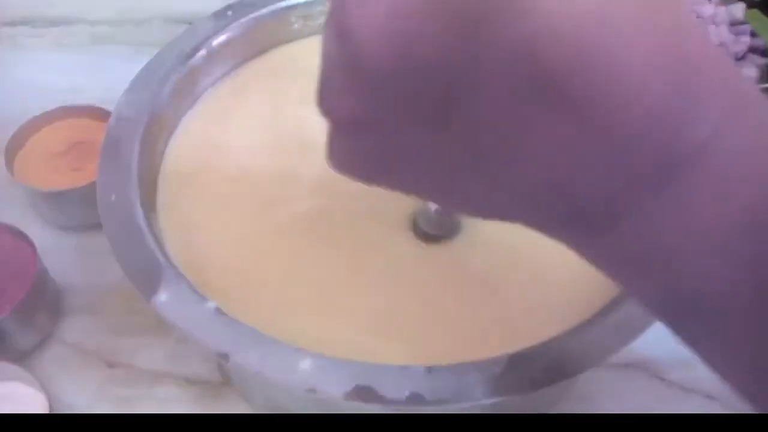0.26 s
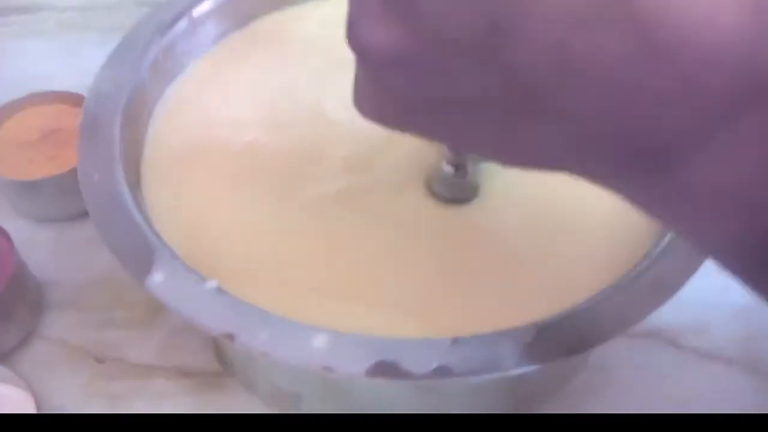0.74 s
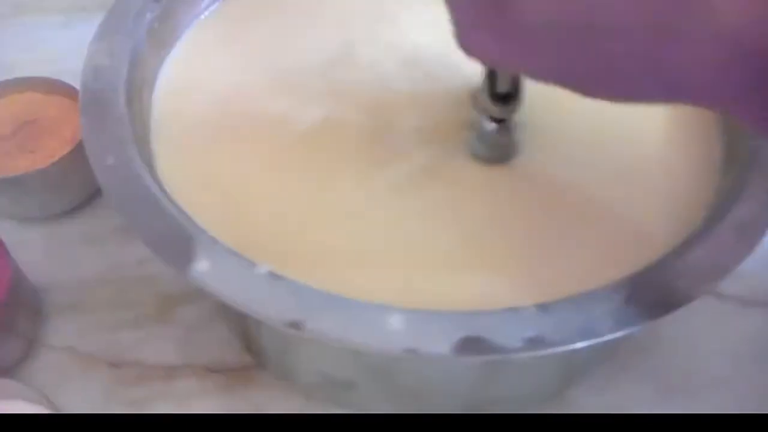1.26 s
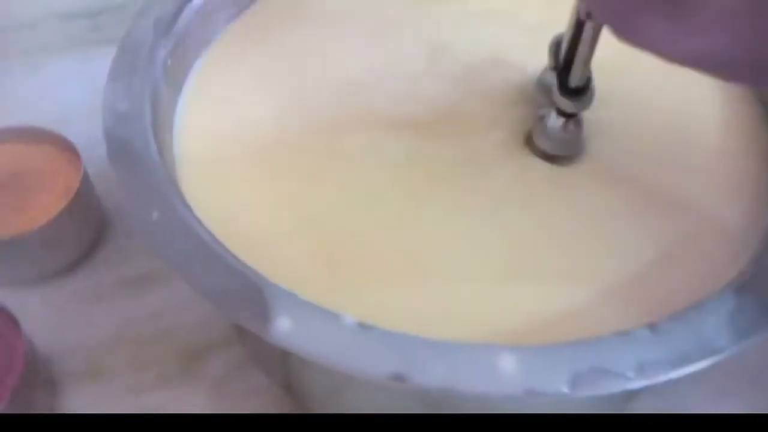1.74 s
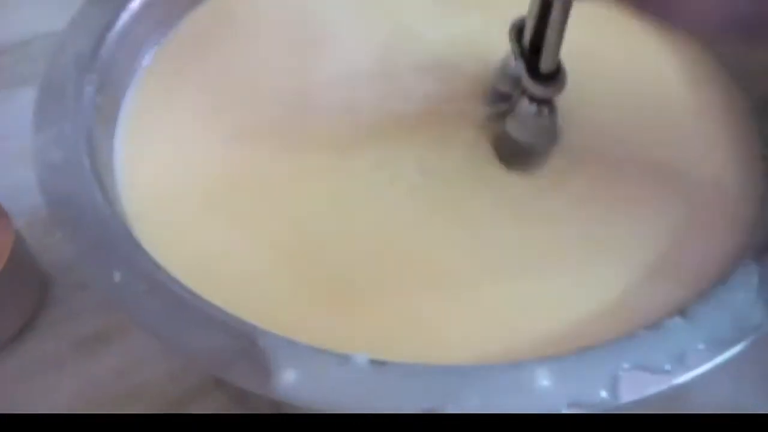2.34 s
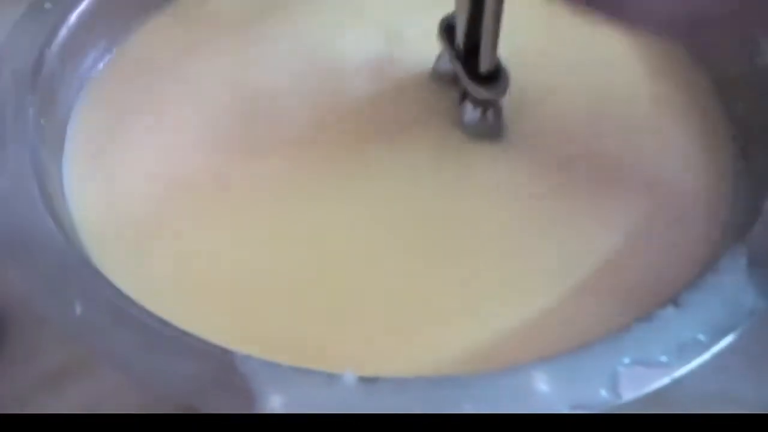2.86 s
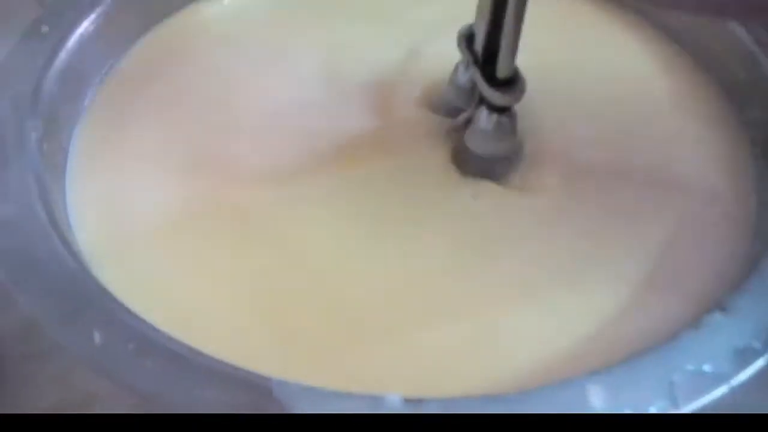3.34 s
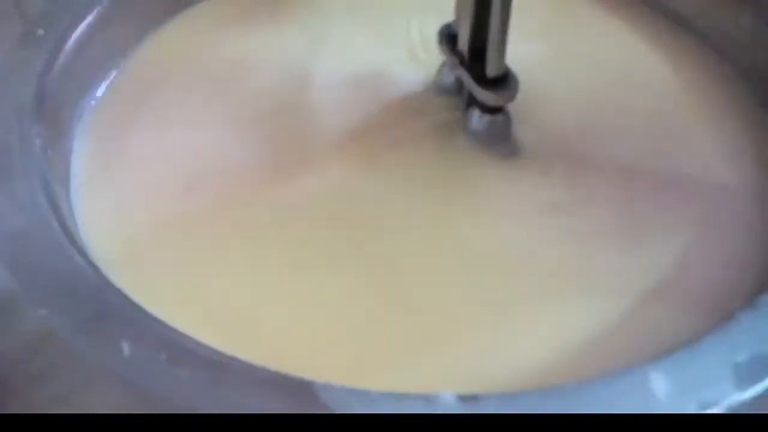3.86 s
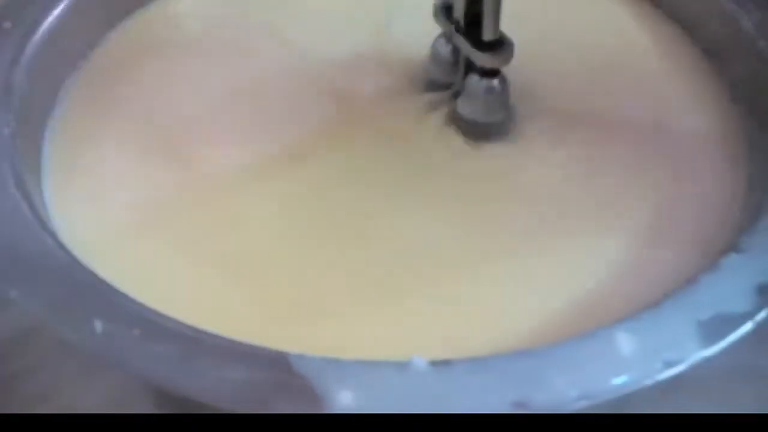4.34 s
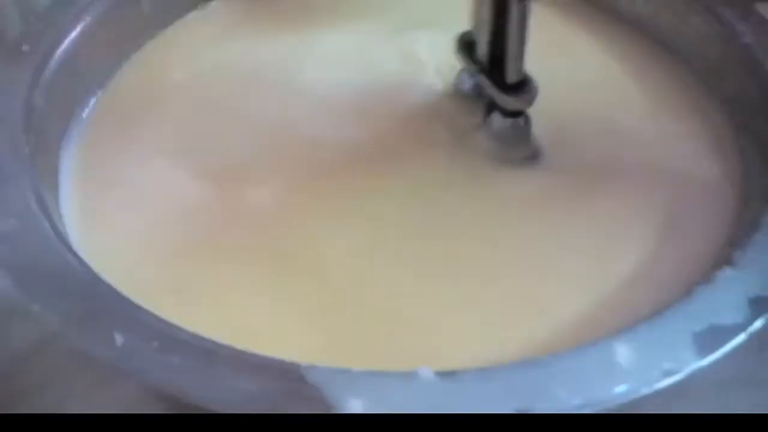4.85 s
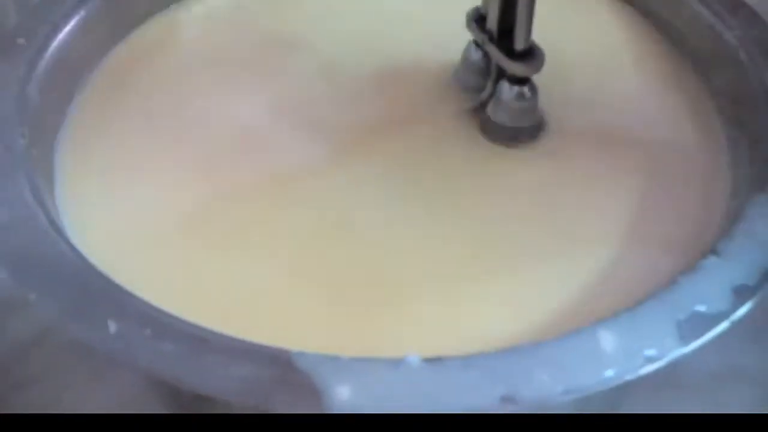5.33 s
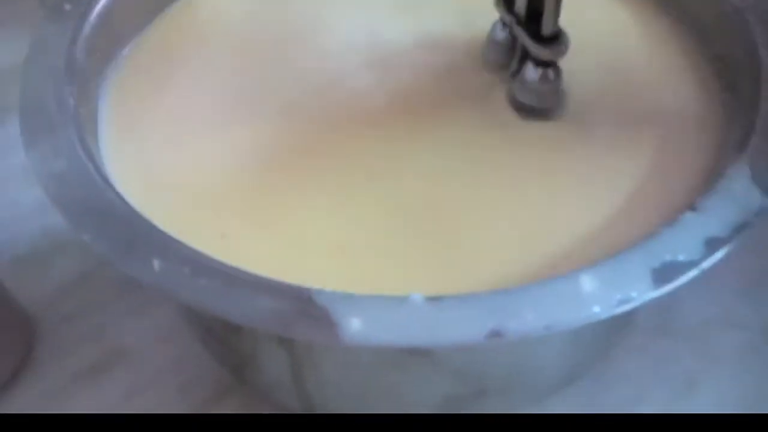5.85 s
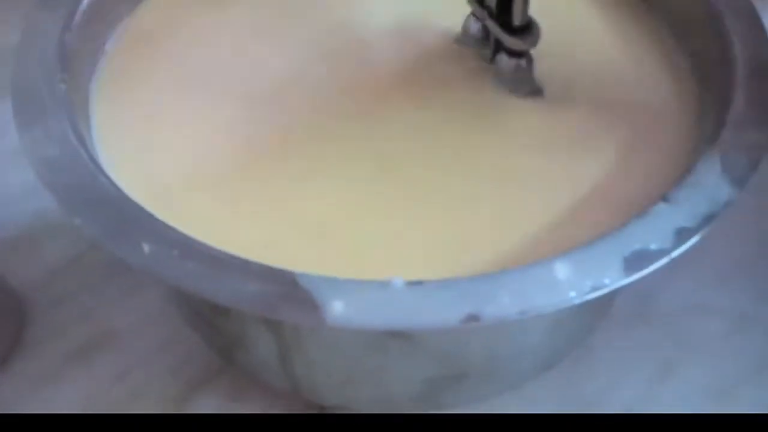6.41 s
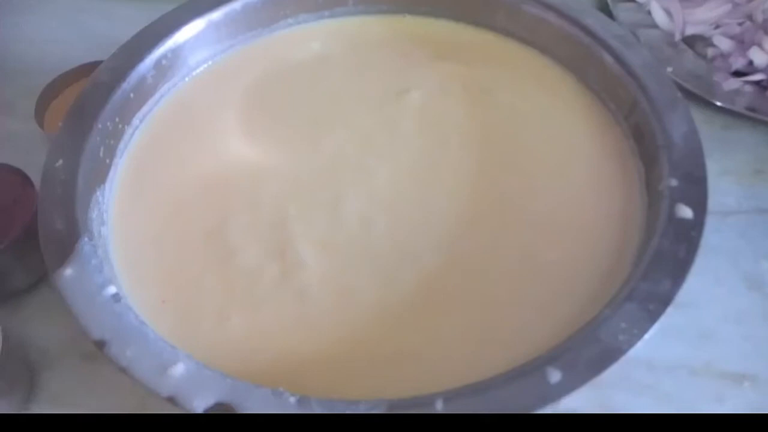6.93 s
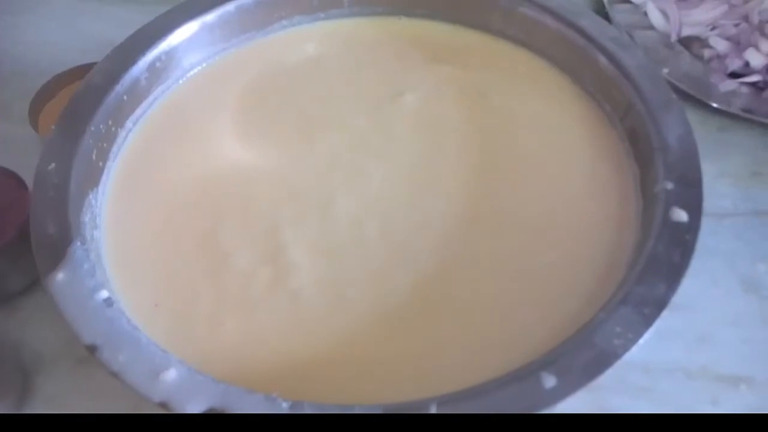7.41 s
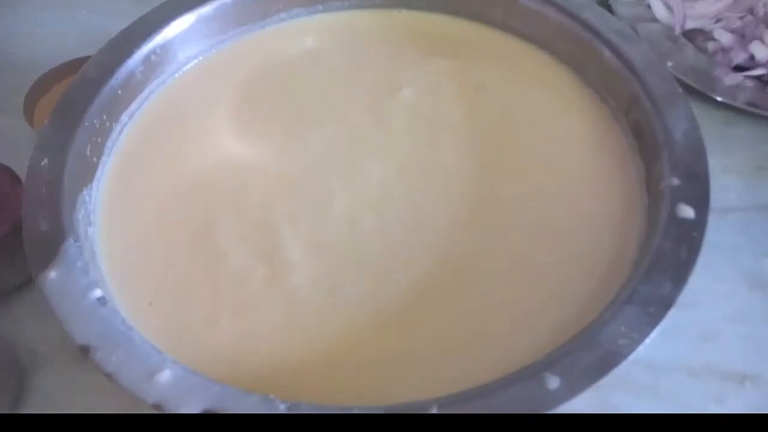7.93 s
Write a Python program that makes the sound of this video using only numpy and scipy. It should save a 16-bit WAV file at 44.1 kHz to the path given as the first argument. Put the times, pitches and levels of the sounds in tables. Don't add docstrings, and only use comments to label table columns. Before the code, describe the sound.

Close to a small microphone, a hand-cranked rotary beater clatters in a steel bowl of thin batter, about thirteen hard, uneven metallic knocks a second over gritty gear chatter. Brief scrapes sing early on. A distant pigeon coos almost inaudibly beneath. At about 6.5 seconds the whisking cuts off, leaving soft kitchen air and fan hum.

```python
import sys
import numpy as np
from scipy import signal
from scipy.fft import rfft, irfft, next_fast_len
from scipy.io import wavfile
from scipy.ndimage import uniform_filter1d

SR = 44100
rng = np.random.default_rng(int(sys.argv[2]) if len(sys.argv) > 2 else 0)


def log_audio(samples):
    frames = np.atleast_2d(samples).T
    limited = np.clip(frames, -1, 1)
    pcm = np.round(limited * 32767).astype(np.int16)
    wavfile.write(sys.argv[1], SR, pcm)


def nominal_scale(level):
    x = np.asarray(level, float) / 20
    return 10 ** x


N = 360605
TIME = np.arange(N) / SR

# (frequency [Hz], width [Hz], level [dB])
BOWL_MODES = [(533, 37, -14.5), (787, 120, -1), (1064, 160, 2), (1240, 74, -4)]
# (frequency [Hz], width [Hz], level [dB])
FRAME_MODES = [(1750, 47, 3), (1980, 1170, -0.5), (2330, 120, 1), (2490, 64, -6), (2670, 135, -5),
               (2840, 83, -0.5), (3100, 220, -5)]
# (frequency [Hz], width [Hz], level [dB])
BLADE_MODES = [(3654, 280, 2.5), (4170, 147, 0), (4585, 540, 0), (5105, 123, -3), (5200, 710, -2),
               (6416, 620, 10)]
# (start [s], length [s], top pitch [Hz], level [dB])
COOS = [
    (3.74, .34, 512, -58),
    (4.66, .44, 521, -55),
    (5.68, .46, 515, -55),
]
# (frequency [Hz], level [dB])
AIR_SPECTRUM = [(30, -7), (170, 7.5), (350, 6), (620, 1.5), (1400, 5.5), (4700, -0.5), (6000, -9),
                (16000, -10.5)]
# (frequency [Hz], width [Hz], level [dB])
FAN_TONES = [(96.8, 9.4, -60), (294, 53, -62), (386, 40, -63.5)]
# (frequency [Hz], width [Hz], level [dB])
SWIRL = (232, 6, -59)
# (frequency [Hz], level [dB])
PORT_SLOPE = [(30, -24.5), (1500, -18), (2200, -11.5), (5300, -11.5), (6500, -18), (7300, -26.5),
              (10000, -27.5), (16000, -33)]
# (frequency [Hz], width [Hz], level [dB])
PORT_PEAKS = [(2700, 356, 3.7), (4810, 415, 6.57), (6080, 980, 1.8), (8770, 790, 7.7), (10350, 510, 5.9),
              (12650, 790, 6.1), (14460, 540, 6.9)]
# (time [s], pitch [Hz], width [Hz], level [dB], decay t60 [s])
DRAGS = [
    (0.321, 2570, 200, -13, 0.38),
    (.64, 2700, 160, -11, 0.2),
    (0.934, 2370, 160, -17, 0.28),
    (1.019, 2430, 150, -9.5, 0.43),
    (1.325, 2570, 200, -10.5, 0.33),
    (1.945, 1750, 80, -19.5, 0.73),
]
# (time [s], level [dB], frame pitch [Hz], bowl minus level [dB])
DULL_KNOCKS = [(0.2331, -2.5, 2480, -32), (0.313, -2.5, 2740, -26), (0.568, -4, 2780, -20),
               (0.6283, -7, 2720, -31), (0.7106, -9.5, 2860, -18), (0.7922, -4.5, 2430, -38),
               (0.9287, -3, 2200, -38), (1.0025, -2.5, 2700, -35), (1.1002, -11.5, 2380, -20),
               (1.1803, -3.5, 2830, -31), (1.2476, -1, 2670, -22), (1.3196, 1, 2840, -33),
               (1.6303, -3, 2300, -41), (1.7104, -5, 2920, -32), (1.9415, -7, 2410, -23),
               (2.0151, 3.5, 2700, -30), (2.0784, -8, 2730, -23), (2.3779, -7, 2540, -18),
               (2.69, 0.5, 2510, -50), (2.752, 2.5, 2720, -32), (2.968, -1, 2830, -19),
               (3.3506, -7.5, 2900, -23), (3.6567, -2.5, 2490, -15.5), (3.7165, -2.5, 2880, -22),
               (3.9337, -1.5, 2720, -23), (4.3133, -6, 2620, -18), (5.3874, -7.5, 2360, -23),
               (5.9535, -1, 2620, -18), (6.0485, -3.5, 2700, -16.5), (6.2679, -1.5, 2390, -21.5)]
# (time [s], level [dB], frame pitch [Hz], bowl minus level [dB])
EVEN_KNOCKS = [(0.1645, -7, 2880, -21), (0.4925, -12, 2850, -35), (0.8692, -3, 2670, -24),
               (1.7176, -2.5, 3100, -43), (1.8782, -4.5, 2850, -29), (2.3934, -3, 3150, -27.5),
               (2.5478, -2, 2770, -40.5), (2.8366, -2, 2780, -23), (3.0507, -4, 2640, -28),
               (3.133, -3, 2850, -24), (3.2055, -6.5, 2800, -21), (3.8058, -1, 2850, -24.5),
               (4.0142, -2, 2980, -23), (4.0956, -4.5, 2850, -23), (4.161, 0, 3100, -21),
               (4.2321, -3, 2890, -20.5), (4.6316, -2.5, 3000, -23.5), (4.689, -3, 2530, -39),
               (4.7902, -9.5, 2700, -25), (5.1595, -3, 2770, -20), (5.2265, -4.5, 2840, -24),
               (5.302, -2, 2800, -30), (5.4551, -2.5, 2920, -29), (5.588, -2.5, 2420, -26),
               (5.755, -2, 2750, -22), (5.8205, 0, 2760, -24), (5.8955, -0.5, 2830, -45),
               (6.1167, -2, 2760, -20), (6.3503, -9, 2430, -21), (6.419, -2.5, 2840, -26)]
# (time [s], level [dB], frame pitch [Hz], bowl minus level [dB])
BRIGHT_KNOCKS = [(0.399, -5.5, 2840, -22.5), (1.4062, -3, 2650, -23), (1.5024, -14, 2470, -36),
                 (1.5699, 0, 2430, -24.5), (1.7992, -7, 3090, -28), (2.097, -4, 2600, -18),
                 (2.1791, -4, 2700, -19.5), (2.2503, 0, 2640, -24), (2.3157, 2.5, 2670, -22.5),
                 (2.4561, -7, 2850, -23), (2.613, 1, 2850, -31), (2.6748, -5.5, 2470, -43),
                 (2.9026, -0.5, 2800, -28), (3.2794, 2.5, 2920, -25), (3.3373, -6, 2920, -20),
                 (3.5127, -1, 2750, -27.5), (3.579, -1, 2530, -27), (3.644, -2, 2440, -22),
                 (3.869, 0.5, 2850, -26), (4.4042, -10, 2780, -37), (4.4784, -1, 2700, -26),
                 (4.5476, -2, 2870, -32), (4.8597, -4.5, 2860, -22), (4.9292, -3.5, 2890, -21),
                 (4.9987, 0, 2190, -25), (5.0915, -12.5, 2500, -13.5), (5.5207, -1, 2830, -29),
                 (5.6632, -5.5, 2830, -20), (6.1893, -1.5, 2720, -19.5), (6.4886, -0.5, 2920, -43)]
# (time [s], level [dB], bright ring minus
# frame [dB])
REBOUNDS = [(0.0344, -12.5, 0.5), (0.3222, -10, 5.5), (0.3334, -12, -27), (0.6382, -7.5, 2),
            (0.7183, -4, -10), (0.7994, -5.5, -2.5), (0.933, -7.5, -6), (1.012, -7, 1.5), (1.017, -18, -16),
            (1.329, -12, -11), (1.3916, -15, 0.5), (1.6363, -12, -4), (1.949, -5.5, 2.5), (2.007, -5, -14),
            (2.976, -6.5, 4), (2.986, -2, -2.5), (3.035, -8, 0.5), (3.0414, -12, 6.5), (3.3499, -11, 5.5),
            (3.3926, -17.5, 8), (3.7252, -2, 0), (3.9487, -6.5, 5.5), (4.6154, -12, 0), (4.624, -14, 3),
            (4.852, -13.5, 10), (4.937, -5, -1.5), (5.604, -2, -2), (5.6734, -8.5, 4), (5.9584, 2, -3),
            (5.9654, -9, -17)]
# (time [s], level [dB], bright ring minus frame [dB])
GAP_TAPS = [(0.1363, -21, 0), (0.295, -11, -13), (0.3613, -11, -8), (0.6648, -17, -12), (0.909, -15, -17),
            (0.9574, -24, -9), (1.494, -20, 5), (1.6876, -23, -14), (1.9799, -12, -9.5), (2.471, -16, -2),
            (2.5147, -31, 11.5), (2.8774, -26, 9), (3.245, -24, 3), (3.2615, -23, -6.5), (3.5397, -26, 9),
            (3.9104, -16.5, 5), (3.9877, -15.5, 4), (4.1116, -25, -2), (4.509, -29, 11), (4.5897, -22, 14),
            (4.837, -15, 3), (4.982, -14, 3), (5.1875, -21, 11), (5.2831, -18.5, 6), (5.3812, -14, 3),
            (5.4964, -32, 17), (5.9854, -20, -35), (6.0219, -20, 1), (6.1614, -17, 3), (6.34, -14, -8)]
# (time [s], level [dB])
EFFORT = [(0.0, -32), (0.42, -29.5), (0.83, -24), (1.19, -28.5), (1.36, -27.5), (2.93, -22.5), (3.28, -27),
          (3.66, -28.5), (3.75, -37), (4.09, -24), (4.27, -26), (4.6, -30), (4.72, -26), (5.16, -25),
          (6.08, -21.5), (6.35, -29), (6.5, -23.5)]
# (frame [dB], bright ring [dB], bowl [dB])
DULL_MIX = (3.04, -2.5, 4.1)
EVEN_MIX = (0.79, 0.99, 7.5)
BRIGHT_MIX = (-3.5, 1.47, 5.8)

SCENE_CHANGE_S, SCENE_FADE_S = 6.543, 0.026
AIR_DB, TEETH_DB = -44, 5
TAP_BOWL_DB, TAP_FRAME_HZ, REBOUND_BOWL_DB = -15.5, 2650, -19.5
LEAD_S, LEAD_SPREAD_S, GAP_S = 0.0055, 0.018, 0.045
LEAD_DB, STRAY_DB, TAP_SCATTER_DB, TAP_BRIGHT_DB, TAP_COLOUR_DB = -25, -27, 4, 3, 4
BLOW_DELAY_S = 0.0007
SETTLE_T60_S = 0.13
CLOSE_FROM_S, CLOSE_BY_S, CLOSE_SHINE_DB = 0.59, 3.9, 2.5
FAR_BLADE_HZ, CLOSE_BLADE_HZ, BLADE_SCATTER_HZ = 3980, 5115, 305
COO_ARCH_HZ, COO_EDGE_S, COO_EDGE_DB = 42, 0.06, -9


def noise():
    return rng.standard_normal(N)


def level(x, db):
    return x * nominal_scale(db) / np.sqrt(np.mean(x ** 2))


def ring(x, hz, width):
    r = np.exp(-np.pi * width / SR)
    gain = np.sqrt(1 - r * r)
    poles = [1, -2 * r * np.cos(2 * np.pi * hz / SR), r * r]
    return signal.lfilter([gain, 0, -gain], poles, x) / 2


def fade(x, t60):
    return signal.lfilter([1], [1, -np.exp(-np.log(1000) / (t60 * SR))], x)


def colour(x, slope, peaks=()):
    size = next_fast_len(N)
    hz = np.maximum(np.arange(size // 2 + 1) * SR / size, 1)
    slope_hz, slope_db = np.transpose(slope)
    db = np.interp(np.log(hz), np.log(slope_hz), slope_db)
    for mid, width, top in peaks:
        db = db + top * np.exp(-2 * ((hz - mid) / width) ** 2)
    cepstrum = irfft(np.log(nominal_scale(db)), size)
    cepstrum[1:size // 2] *= 2
    cepstrum[size // 2 + 1:] = 0
    return irfft(rfft(x, size) * np.exp(rfft(cepstrum)), size)[:N]


def hum(hz, width, db):
    wave = ring(ring(noise(), hz, width), hz, width)
    envelope = np.abs(signal.hilbert(wave, next_fast_len(N))[:N])
    return level(wave / envelope ** 0.35, db)


def kitchen():
    drift = uniform_filter1d(uniform_filter1d(noise(), size=5000), size=5000)
    swell = nominal_scale(level(drift, db=3))
    murmur = swell * level(ring(noise(), hz=378, width=320), db=-37)
    air = level(colour(noise(), AIR_SPECTRUM), AIR_DB + 13.5)
    fan = sum(hum(hz, width, db + 21.5) for hz, width, db in FAN_TONES)
    return air + murmur + fan


def chatter(rate, spread_db, t60):
    heights = nominal_scale(spread_db * np.minimum(rng.exponential(size=N), 2.5))
    ticks = (rng.random(N) < rate / SR) * heights
    return level(fade(ticks, t60), 0)


def hits():
    knocks = []
    for kind, mix in ((DULL_KNOCKS, DULL_MIX), (EVEN_KNOCKS, EVEN_MIX), (BRIGHT_KNOCKS, BRIGHT_MIX)):
        for s, db, hz, bowl in kind:
            knocks.append((s, db + mix[0], db + mix[1], db + bowl + mix[2], hz))
    knocks = np.array(sorted(knocks))
    rebounds = [(s, db, db + bright, db + REBOUND_BOWL_DB, TAP_FRAME_HZ)
                for s, db, bright in REBOUNDS + GAP_TAPS]

    when = rng.random((len(knocks), 2))
    luck = np.minimum(rng.standard_normal((len(knocks), 4)), 1)
    s = knocks[:, :1] - [LEAD_S, LEAD_S + LEAD_SPREAD_S] - when * [LEAD_SPREAD_S, GAP_S - LEAD_SPREAD_S]
    loudest = np.max(knocks[:, 1:3], axis=1, keepdims=True)
    db = loudest + [LEAD_DB, STRAY_DB] + TAP_SCATTER_DB * luck[:, :2]
    bright = db + TAP_BRIGHT_DB + TAP_COLOUR_DB * luck[:, 2:]
    frame_hz = np.full(s.size, TAP_FRAME_HZ)
    taps = np.transpose([s.ravel(), db.ravel(), bright.ravel(), db.ravel() + TAP_BOWL_DB, frame_hz])
    return np.vstack([knocks, rebounds, taps]).T


def strikes(s, db):
    out = np.zeros(N)
    out[((s + BLOW_DELAY_S) * SR).astype(int)] = nominal_scale(db)
    return out


def contact(s, db, t60, rise, grit, settle, tick_db):
    blow = strikes(s, db)
    cluster = grit * (fade(blow, t60) - fade(blow, rise))
    rattle = settle * fade(blow, SETTLE_T60_S)
    touch = nominal_scale(tick_db) * blow * rng.choice([-1, 1])
    return (cluster + rattle) * noise() + touch


def struck(modes, s, db, centre_hz, teeth, grit, settle, t60, scatter_db, focus_db):
    mode_hz, _, top_db = np.transpose(modes)
    share = top_db + scatter_db * rng.standard_normal((len(db), len(modes)))
    share = share - focus_db * np.abs(10 * np.log(mode_hz / centre_hz[:, None]))
    share = share - 10 * np.log10(np.sum(nominal_scale(2 * share), axis=1, keepdims=True))
    out = 0
    for k, (hz, width, top) in enumerate(modes):
        blows = contact(s, db + share[:, k], t60, 0.0029, grit, settle, tick_db=14)
        out = out + ring(blows + nominal_scale(top) * teeth * noise(), hz, width)
    return out


def drags():
    out = 0
    for s, hz, width, db, t60 in DRAGS:
        sing = level(ring(ring(noise(), hz, width), hz, 2 * width), db)
        start = 1.0 * (np.arange(N) == int(s * SR))
        out = out + fade(start, t60) * sing
    return out


def closeness(at):
    return np.clip((at - CLOSE_FROM_S) / (CLOSE_BY_S - CLOSE_FROM_S), 0, 1)


def beater():
    s, frame_db, bright_db, bowl_db, frame_hz = hits()
    blade_hz = FAR_BLADE_HZ + (CLOSE_BLADE_HZ - FAR_BLADE_HZ) * closeness(s)
    blade_hz = blade_hz + BLADE_SCATTER_HZ * rng.standard_normal(len(s))

    effort = nominal_scale(np.interp(TIME, *np.transpose(EFFORT)) + TEETH_DB)
    teeth = (0.19 + 0.56 * chatter(rate=280, spread_db=5, t60=0.021)) * effort
    shine = teeth * nominal_scale(CLOSE_SHINE_DB * closeness(TIME))
    settle = nominal_scale(-16.5) * (0.62 + 0.71 * chatter(rate=410, spread_db=5.5, t60=0.17))
    grit = 0.7 + 0.4 * chatter(rate=700, spread_db=4, t60=0.005)

    bowl = struck(BOWL_MODES, s, bowl_db + 8.5, frame_hz / 2.89, nominal_scale(-8) * teeth, grit, settle,
                  t60=0.051, scatter_db=4, focus_db=6)
    frame = struck(FRAME_MODES, s, frame_db + 4.5, frame_hz, nominal_scale(-7) * teeth, grit, nominal_scale(-1.5) * settle,
                   t60=0.02, scatter_db=3.5, focus_db=3.5)
    blades = struck(BLADE_MODES, s, bright_db + 5, blade_hz, nominal_scale(-9.5) * shine, grit, nominal_scale(2) * settle,
                    t60=0.014, scatter_db=3.5, focus_db=3.5)
    crack = contact(s, bright_db + 7, t60=0.0095, rise=0.0049, grit=grit, settle=nominal_scale(-1) * settle, tick_db=8)
    hiss = nominal_scale(-2) * shine * noise()
    shake = level(ring(noise(), hz=35, width=110), db=-37.5)
    sing = nominal_scale(-9) * ring(ring(teeth * noise(), hz=2720, width=300), hz=2720, width=710)
    swirl_hz, swirl_width, swirl_db = SWIRL
    swirl = hum(swirl_hz, swirl_width, swirl_db + 21)
    return sing + bowl + frame + blades + crack + hiss + drags() + shake + swirl


def pigeon():
    out = 0
    flutter = level(uniform_filter1d(noise(), size=1500), 5)
    for s, length, hz, db in COOS:
        arch = hz - COO_ARCH_HZ * np.clip(2 * (TIME - s) / length - 1, -1, 1) ** 2
        edge = np.minimum(TIME - s, s + length - TIME) / COO_EDGE_S
        swell = (edge > 0) * nominal_scale(db + COO_EDGE_DB * (1 - np.clip(edge, 0, 1)) + flutter + 26)
        out = out + swell * np.sin(2 * np.pi * np.cumsum(arch) / SR)
    return out


def scene():
    whisking = np.clip((SCENE_CHANGE_S - TIME) / SCENE_FADE_S, 0, 1)
    mix = whisking * (beater() + pigeon()) + nominal_scale(1.1 * whisking) * kitchen()
    return mix[None]


def low_pass(x):
    return signal.sosfilt(signal.butter(12, 16480, fs=SR, output="sos"), x)


def record(dry):
    x = colour(dry[0], PORT_SLOPE, PORT_PEAKS)
    x = x / (1 + np.abs(x / 0.96) ** 10) ** (1 / 10)
    x = x + 0.035 * signal.lfilter(*signal.butter(1, 25, "high", fs=SR), x * x)
    x = signal.sosfilt(signal.ellip(10, 0.2, 60, 15750, fs=SR, output="sos"), x)
    return low_pass(x[None])


dry = scene()
out = record(dry)
log_audio(out)
```